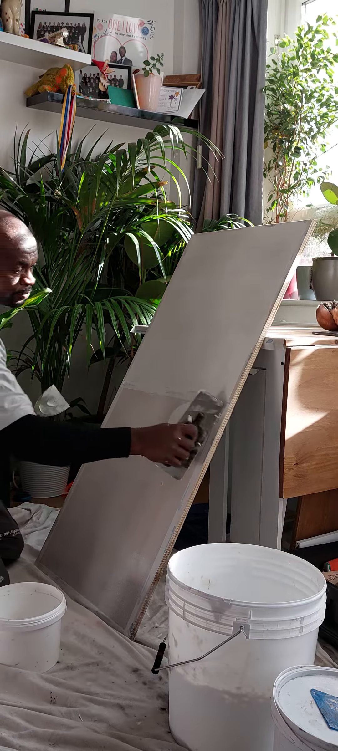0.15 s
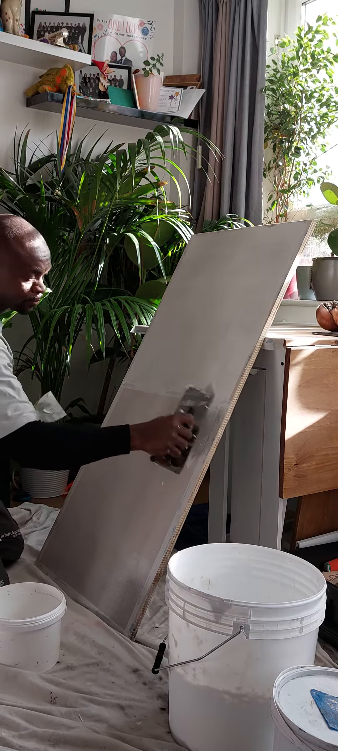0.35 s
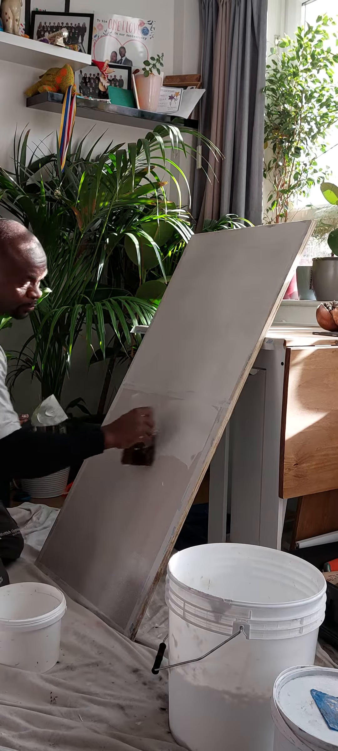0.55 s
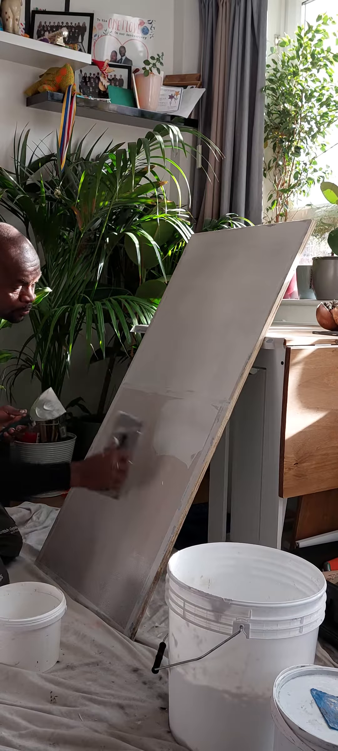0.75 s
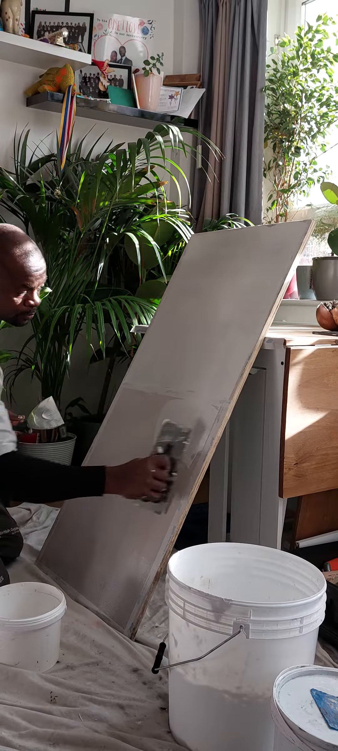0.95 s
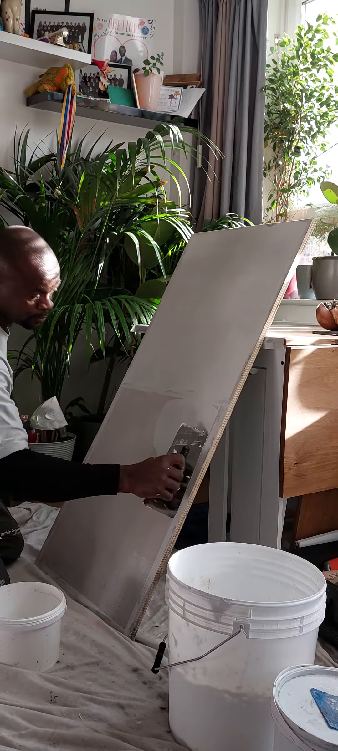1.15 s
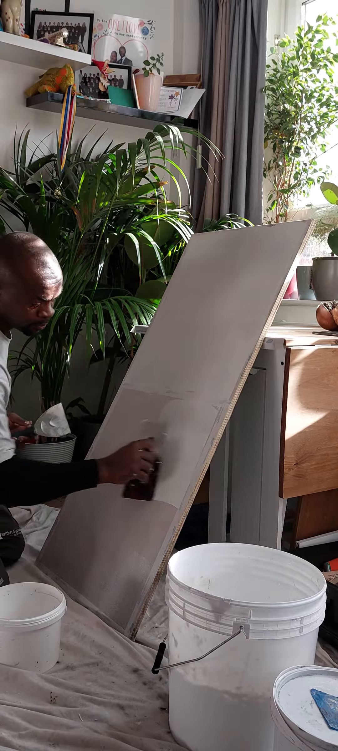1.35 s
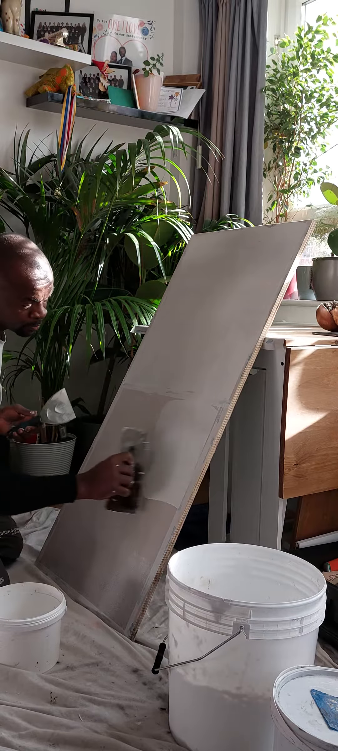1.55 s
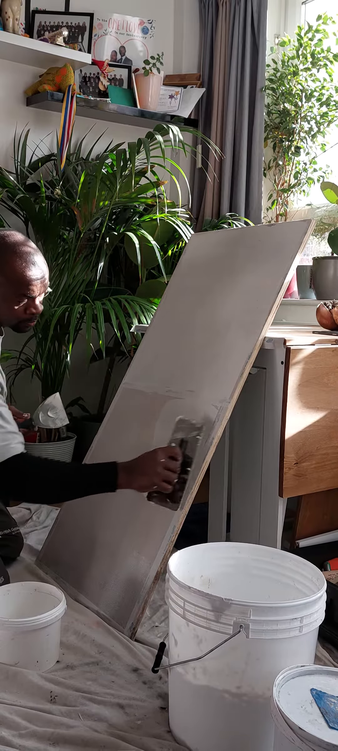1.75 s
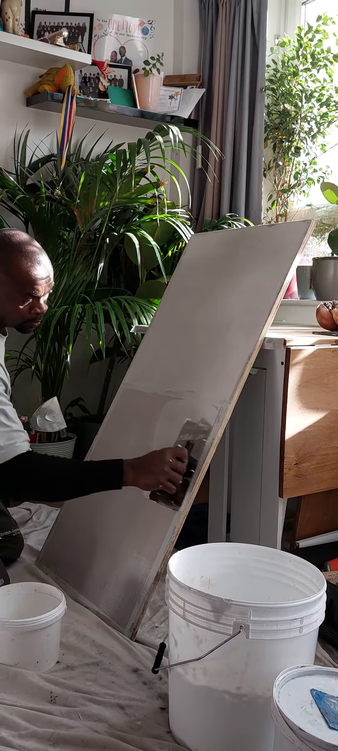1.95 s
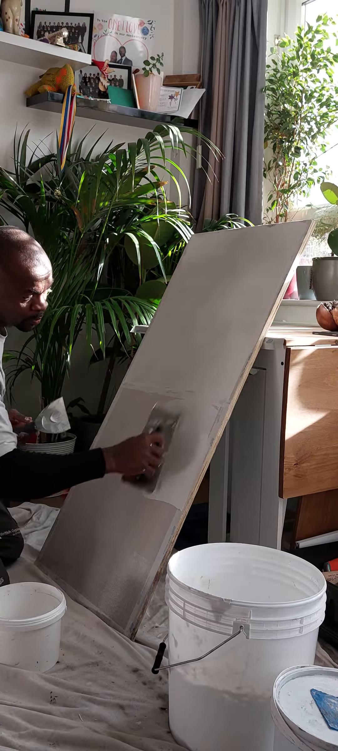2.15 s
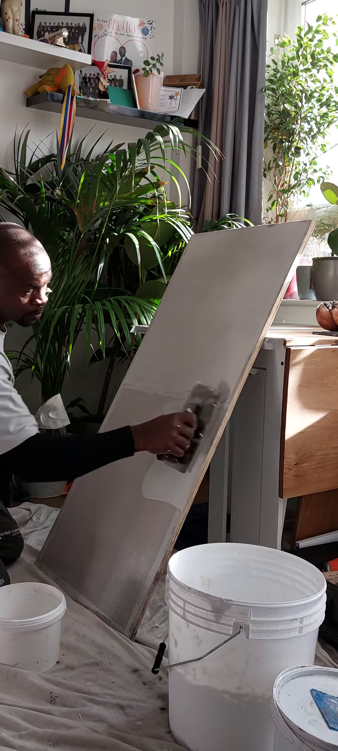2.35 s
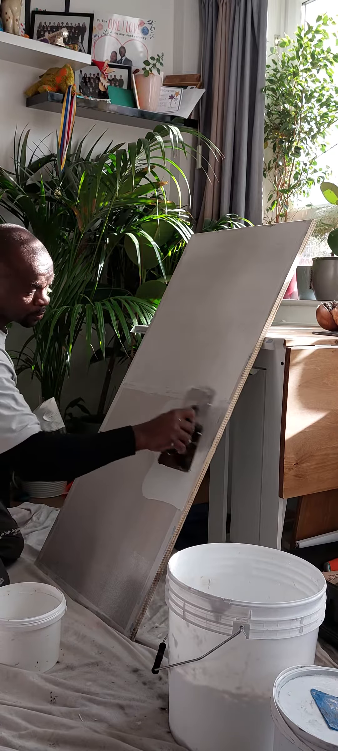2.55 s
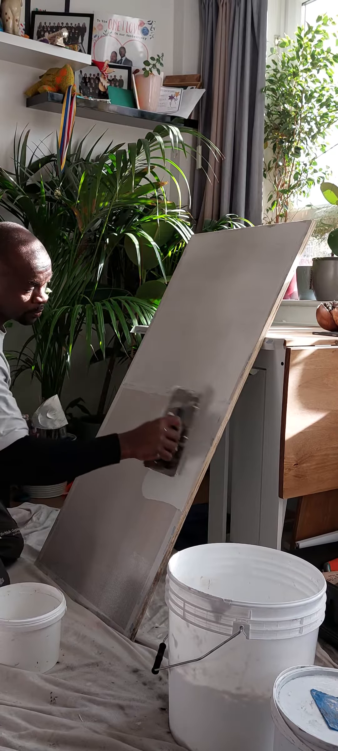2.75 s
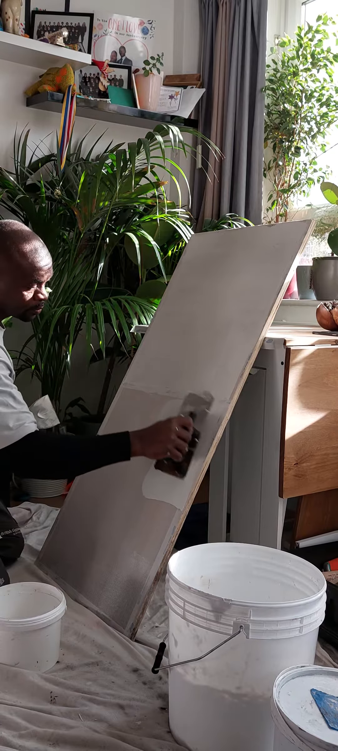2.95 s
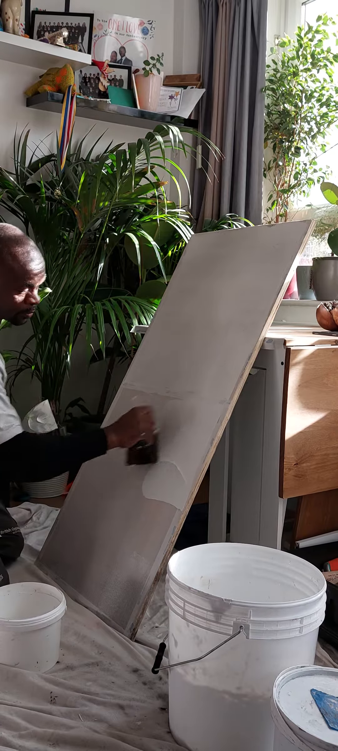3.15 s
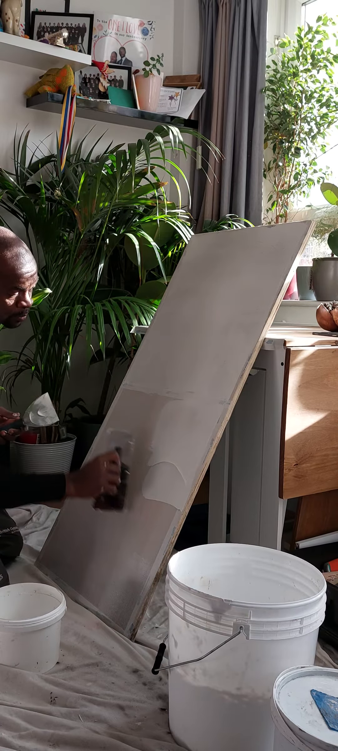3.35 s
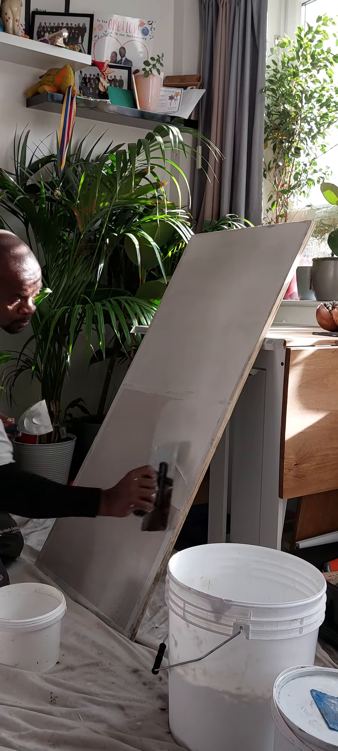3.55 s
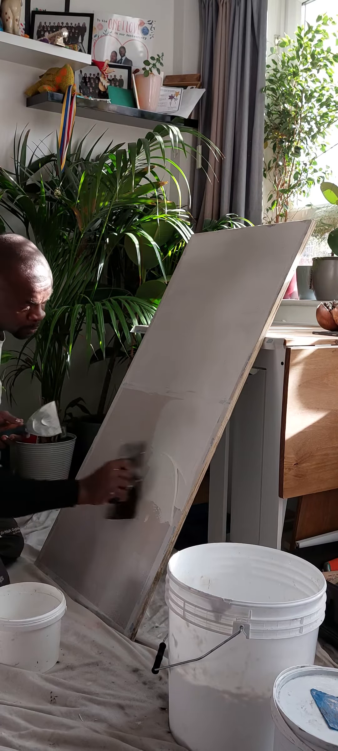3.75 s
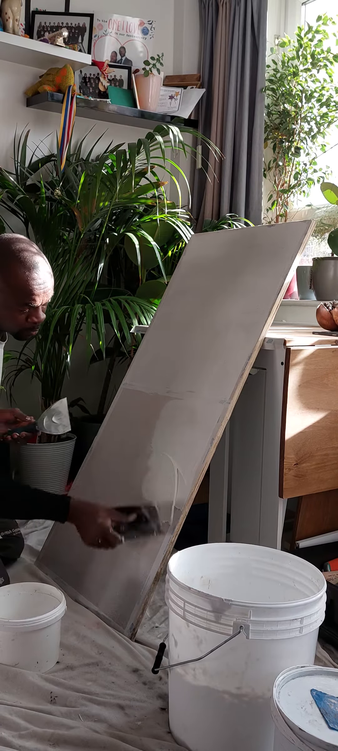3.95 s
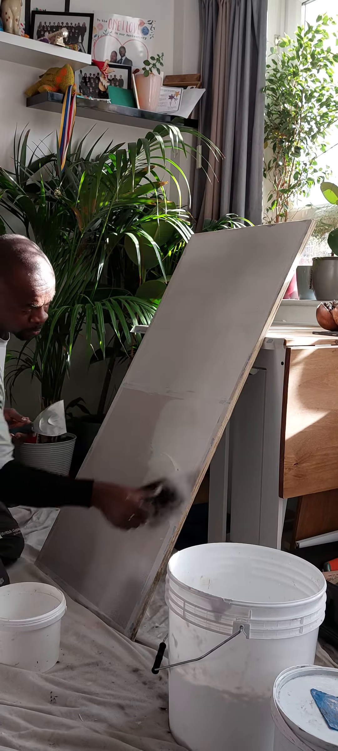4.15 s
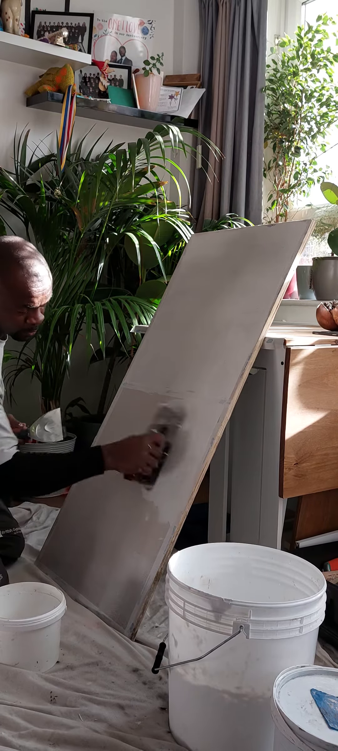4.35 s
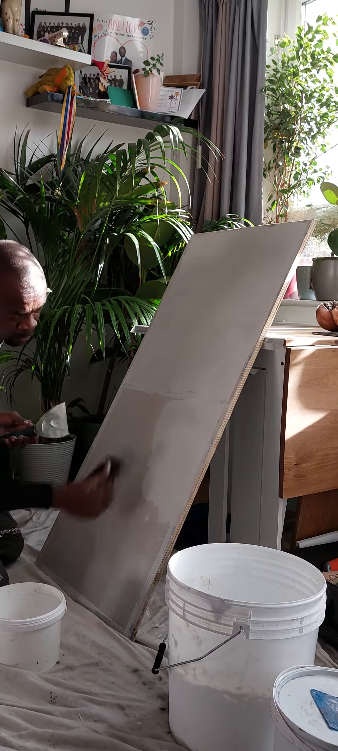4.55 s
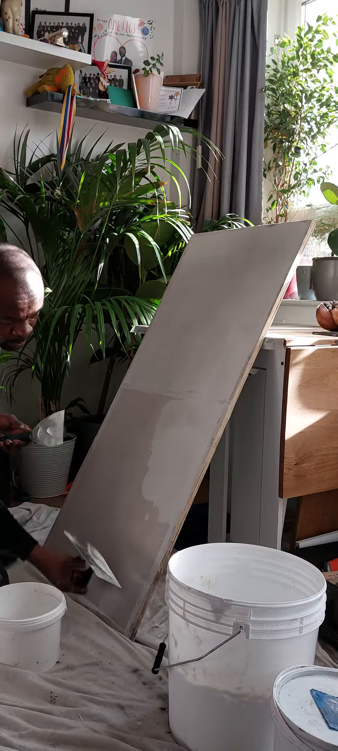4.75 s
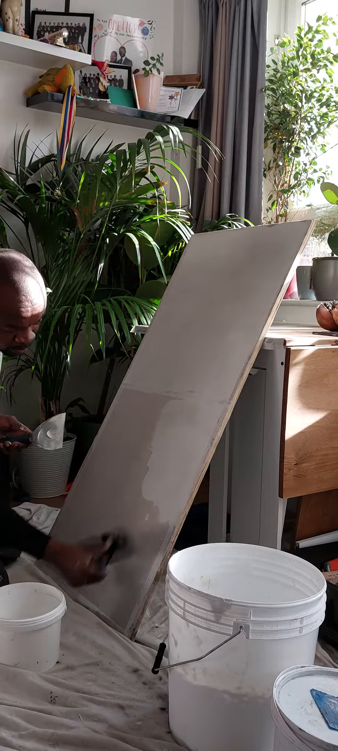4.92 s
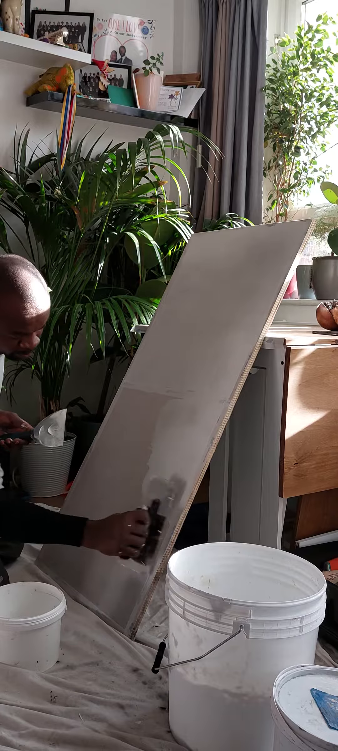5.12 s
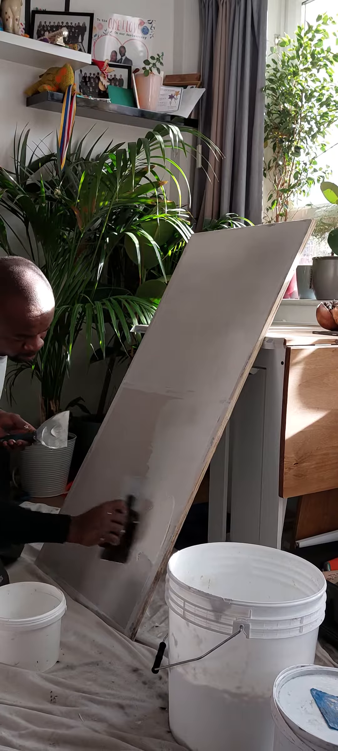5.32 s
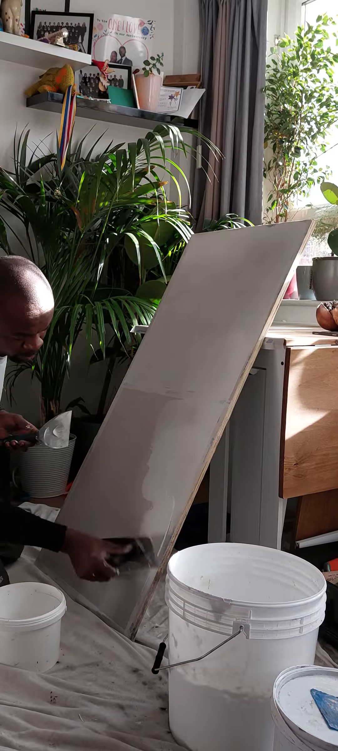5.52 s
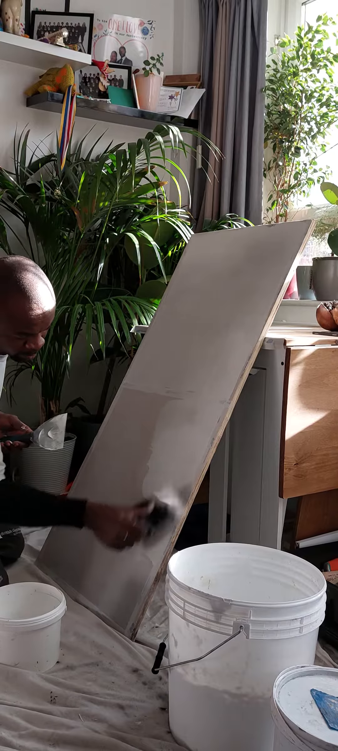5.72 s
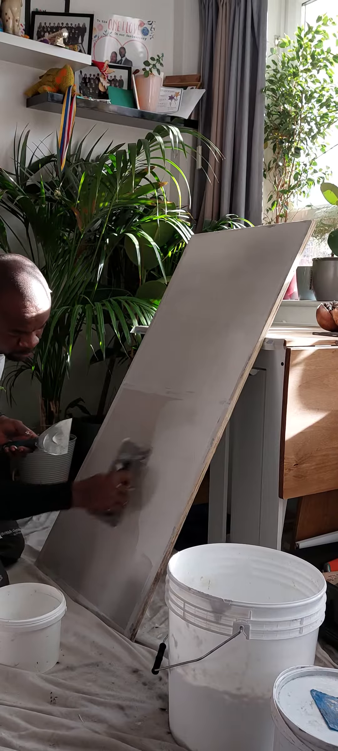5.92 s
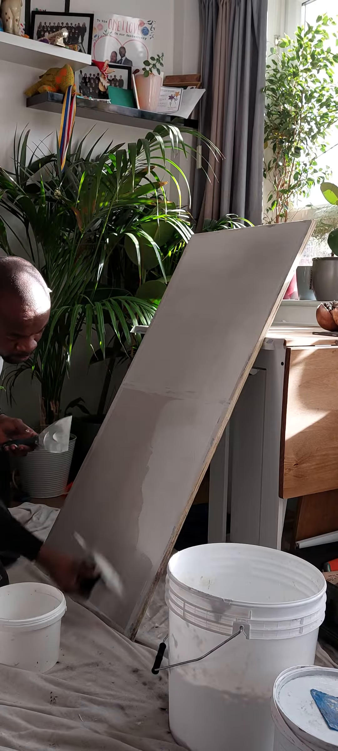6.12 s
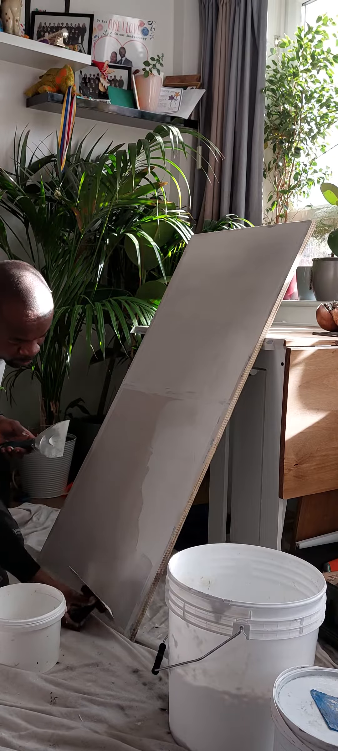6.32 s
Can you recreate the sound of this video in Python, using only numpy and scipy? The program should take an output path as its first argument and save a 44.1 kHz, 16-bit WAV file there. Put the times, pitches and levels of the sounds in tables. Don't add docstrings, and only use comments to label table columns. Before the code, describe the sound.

A plasterer's steel blade rasps over a board, long and short strokes alternating irregularly. Dense sandy hiss mixes with a midrange metallic ring and a low panel boom. Light edge taps and dull hand bumps come between strokes. The scraping stops after four and a half seconds, then a tiny soft scrape and one last fuller sweep follow. Short room tails, faint hum and still air, heard closely in stereo.

```python
import sys
import numpy as np
from scipy import signal
from scipy.fft import rfft, irfft, next_fast_len
from scipy.io import wavfile
from scipy.ndimage import uniform_filter1d

SR = 44100
rng = np.random.default_rng(int(sys.argv[2]) if len(sys.argv) > 2 else 0)


def magnitude_from_level(level_db):
    exponent = np.asarray(level_db, float) / 20
    return 10 ** exponent


def inscribe(sig):
    pcm = np.round(np.clip(np.atleast_2d(sig).T, -1, 1) * 32767)
    wavfile.write(sys.argv[1], SR, pcm.astype(np.int16))


N = 281358


def evened(x):
    return x / np.sqrt(np.mean(x ** 2) + 1e-20)


def read(points, hz):
    f, value = np.transpose(points)
    return np.interp(np.log(hz + 1), np.log(f + 1), value)


def colour(x, gain):
    size = next_fast_len(x.shape[-1])
    spectrum = rfft(x, size) * gain(np.fft.rfftfreq(size, 1 / SR))
    return irfft(spectrum, size)[..., :x.shape[-1]]


def above(x, hz, order=4):
    return signal.sosfilt(signal.butter(order, hz, "high", fs=SR, output="sos"), x)


def drift(per_s):
    rate = 40
    steps = rng.standard_normal(int(N / SR * rate) + 2)
    for _ in range(2):
        steps = uniform_filter1d(steps, int(rate / per_s))
    return np.interp(np.arange(N) / SR * rate, np.arange(len(steps)), evened(steps))


def ring(force, modes, wander_db=0):
    out = np.zeros(N)
    power = 0
    for k, (hz, width, db) in enumerate(modes):
        r = np.exp(-np.pi * width / SR)
        turn = np.exp(2j * np.pi * np.cumsum(hz * np.ones(N)) / SR)
        drive = force * magnitude_from_level(db + wander_db * drift(6))
        swing = turn * signal.lfilter([1 - r], [1, -r], drive / turn)
        out += (-1) ** k * 2 * swing.imag
        power += np.pi * width / SR * magnitude_from_level(2 * db)
    return out / np.sqrt(power)


def pair(a, b, same, hz):
    c = np.clip(read(same, hz), -1, 1)
    return np.array([a, c * a + np.sqrt(1 - c ** 2) * b])


# frequency in Hz, level in dB per Hz.
AIR_COLOUR = [(90, -40), (150, -2), (220, 0), (430, -6), (850, -10.5), (1550, -13), (2700, -19),
              (4600, -19), (7200, -19), (9200, -21.5), (11700, -20.5), (15700, -21.5)]
# frequency in Hz, left-right likeness from -1 to 1.
AIR_LIKENESS = [(60, -0.075), (380, 0.73), (2380, -0.04), (15000, 0.5)]
# time in seconds, lift in dB.
AIR_SWELLS = [(0, 14.5), (.15, 3.5), (1.001, 0.5), (1.801, -5), (2.4, -2), (3.6, -1.5), (4.78, 1),
              (4.92, -2), (5.171, -4), (5.211, 1.5), (6.2, -3), (6.38, -3.5)]


def air():
    hz = np.fft.rfftfreq(2048, 1 / SR)[:, None]
    a, b, c, d = rng.standard_normal((N // 512 + 5, 1025, 4)).T
    z = pair(a + 1j * b, c + 1j * d, AIR_LIKENESS, hz) * magnitude_from_level(read(AIR_COLOUR, hz))
    noise = signal.istft(z, nperseg=2048, noverlap=1536)[1][:, :N]
    swell_db = np.interp(np.arange(N) / SR, *np.transpose(AIR_SWELLS)) + drift(4.1)
    return magnitude_from_level(-71.5 + swell_db) * evened(noise)


# frequency in Hz, width in Hz, level in dB.
ROCKING_MODES = [(69, 27, 2), (119, 28, 2), (50.4, 20, -14.5), (86.5, 25, -6.5)]
# time in seconds, level in dB.
HAND_JOLTS = [
    (.22, -43.5),
    (1.13, -55),
    (1.9, -55),
    (2.23, -51.5),
    (2.93, -48.5),
    (3.35, -44.5),
    (3.5, -60),
    (4.1, -49.5),
    (5.38, -56),
    (5.86, -45.5),
]


def rocking(leaning):
    settle_s, hum_db = .05, -71.5
    keep = np.exp(-1 / (settle_s * SR))
    jolts = np.zeros(N)
    for s, db in HAND_JOLTS:
        jolts[round(s * SR)] = magnitude_from_level(db) / (1 - keep)
    hand = signal.lfilter([1 - keep], [1, -keep], leaning + jolts)
    push = np.hypot(hand, magnitude_from_level(hum_db))
    return ring(rng.standard_normal(N) * push, ROCKING_MODES, wander_db=4.5)


def grit(per_s, spread_db, judder_db):
    size = magnitude_from_level(spread_db * np.minimum(rng.exponential(1, N), 4)) * rng.choice([-1., 1.], N)
    clicks = size * (rng.random(N) < per_s / SR)
    rushes = evened(signal.lfilter([1], [1, -.997], rng.standard_normal(N)))
    return evened(clicks) * magnitude_from_level(judder_db * rushes)


def lay(contact, curves, start, end, *columns):
    inside = slice(round(start * SR), round(end * SR))
    t = np.arange(N)[inside] / SR
    louder = columns[0][inside] > curves[0, inside]
    for row, column in zip(curves, columns):
        row[inside] = np.where(louder, (column + np.zeros(N))[inside], row[inside])
    edges = np.clip(np.minimum((t - start) / 0.0058, (end - t) / 0.007), 0, 1)
    contact[inside] = np.maximum(contact[inside], edges)


# start in seconds, length in seconds,
# hiss in dB, board bending in dB re hiss, board boom in dB re hiss.
BLADE_CREEPS = [
    (0, 0.043, -63.5, -1.5, 13.5),
    (.191, 0.08, -52.5, 13, 16),
    (1.1, .135, -61.5, 0.5, 17.5),
    (1.875, .09, -50.5, 12, 16),
    (2.426, 0.14, -51.5, 2.5, 14),
    (5.197, 0.15, -80, 13.5, 20.5),
    (5.488, 0.23, -61.5, 13, 14),
    (6.33, 0.0861, -87, 15, 0.5),
]


def creep(contact, curves):
    t = np.arange(N) / SR
    for s, length, db, bending_db, boom_db in BLADE_CREEPS:
        hiss_db = db - 7.5 * (t - s) / length
        blade_db = 3.5 - 0.38 * (db + 56)
        chatter_hz, pan_db = 1150, 0
        lay(contact, curves, s, s + length, hiss_db, blade_db, bending_db, boom_db, chatter_hz, pan_db)


# bite in seconds, speeding up in seconds, lift in seconds,
# grit hiss at full speed in dB, last flick in dB.
BLADE_SWEEPS = [
    (.278, 0.2, 0.63, -28, 4),
    (1.223, 0.18, 1.47, -31, 2),
    (1.945, .12, 2.121, -28.5, -1),
    (2.52, 0.11, 2.648, -30, 3),
    (2.909, .14, 3.247, -29, 4),
    (3.713, .075, 3.801, -29, 2),
    (4.055, .15, 4.455, -30, -0.5),
    (5.311, 0.044, 5.368, -33, 3),
    (5.592, 0.17, 5.926, -28, -2.5),
]
# blade ring in dB re hiss, board bending in dB re hiss,
# board boom in dB re hiss, blade chatter in Hz, left-right balance in dB.
SWEEP_GRIPS = [(7.5, 0.5, -3, 1260, 0.5), (4.5, -1.5, -1, 1220, -0.5), (4.5, -2, -4, 1323, 0.5),
               (8, -1.5, -6, 1360, -0.5), (5, -1, -3.5, 1290, 0), (8, -4.5, -15, 1350, 1.5),
               (5.5, -3, -4, 1220, -1), (11, -3.5, -12.5, 1250, 0), (4.5, -0.5, -5.5, 1280, 0.5)]
# bite in dB re full speed, share of the slow start the board ignores
# (up to 1; below 0 the board loads late), heaviest lean in seconds.
SWEEP_LEANS = [(-16, .6, 0.87), (-13, 0.5, 1.28), (-17, 0.36, 2.025), (-13, 0.5, 2.63), (-14, 0.92, 3.15),
               (-35, -.2, 3.82), (-13.5, 0.8, 4.26), (-31.5, -.4, 5.42), (-20.5, 0.35, 5.8)]


def sweep(contact, curves):
    flick_s, lift_s, lean_s = 0.04, .1, 0.061
    t = np.arange(N) / SR
    for (s, rise, lift, db, flick_db), grip, (bite_db, lag, lean_at) in zip(BLADE_SWEEPS, SWEEP_GRIPS, SWEEP_LEANS):
        blade_db, bending_db, boom_db, hz, pan_db = grip
        bite = magnitude_from_level(bite_db)
        speed = bite + (1 - bite) * np.clip((t - s) / rise, 0, 1) ** 1.47
        slow_db = 20 * np.log10(speed)
        flick = np.exp(-np.maximum(lift - t, 0) / flick_s)
        after = np.maximum(t - lift, 0)
        lean = np.exp(-((t - lean_at) / lean_s) ** 2)
        hiss_db = db + slow_db + flick_db * flick - 240 * after * (1 + 4.2 * after)
        blade_db = blade_db - 79.5 * after
        bending_db = bending_db + 3.5 * flick ** 1.2 - (lag - .45) * slow_db
        boom_db = boom_db - lag * slow_db - flick_db * flick + 5 * lean + 60.5 * after
        chatter_hz = hz + 90 * (flick - .5)
        lay(contact, curves, s, lift + lift_s, hiss_db, blade_db, bending_db, boom_db, chatter_hz, pan_db)


def blade_motion():
    contact = np.zeros(N)
    curves = np.zeros((6, N)) + [[-120], [0], [0], [0], [1200], [0]]
    creep(contact, curves)
    sweep(contact, curves)
    curves[4] += 72.4 * drift(10)
    curves[5] += 1.5 * drift(11)
    return contact, curves


# frequency in Hz, level in dB per Hz.
GRIT_COLOUR = [(1000, -35.5), (1700, 2), (2050, -1.5), (2250, -6), (2710, -3), (2980, -9), (3970, -8.5),
               (5560, -13.5), (7700, -15.5), (9200, -23.5), (12100, -16), (15100, -18.5), (15800, -22.5)]


def grit_hiss(pressed, force):
    def gain(hz):
        return magnitude_from_level(read(GRIT_COLOUR, hz))
    return magnitude_from_level(0.36) * colour(pressed, gain) / np.std(colour(force, gain))


# frequency in Hz, width in Hz, level in dB.
SCRAPING_EDGE = [(2078, 130, -5.5), (2485, 20, -4.5), (2507, 29, -10.5), (3130, 37, -0.5)]


def edge_ring(pressed):
    return magnitude_from_level(-10) * above(ring(pressed, SCRAPING_EDGE, wander_db=1.5), 1700)


# frequency in Hz, width in Hz, level in dB.
BLADE_MODES = [(874, 77, -10), (887, 29, -8.5), (1048, 170, -13), (1194, 16, -11.5), (1365, 77, -6),
               (1552, 70, -4), (1660, 53, -15.5), (1250, 840, -13)]


def blade_ring(force, chatter_hz):
    blade = above(ring(force, [*BLADE_MODES, (chatter_hz, 260, -1.5)], wander_db=.8), 600)
    return signal.sosfilt(signal.butter(2, 1900, fs=SR, output="sos"), blade)


# frequency in Hz, width in Hz, level in dB.
BOARD_BENDING = [(427, 76, -6.5), (528.5, 11, -5), (564.3, 28, 6), (613, 39, -17), (649, 100, -9),
                 (656, 67, -4.5), (785, 9, -24.5), (542, 353, -3)]


def board_bending(force):
    return above(ring(force, BOARD_BENDING, wander_db=.8), 360)


# frequency in Hz, width in Hz, level in dB.
BOARD_BOOM = [(223, 9, 0), (291, 18, -12), (345, 30, -19), (176, 14, -20), (255, 40, -22)]


def board_boom(force):
    return above(ring(force, BOARD_BOOM, wander_db=0.8), 210)


# time in seconds, peak in dB, board share in dB.
EDGE_TOUCHES = [(0.196, -41, 8.5), (0.28, -36, -16), (1.108, -42, 9), (1.229, -46, 15.5),
                (1.877, -34.5, -3.5), (2.429, -36.5, -14), (2.525, -34, -33), (2.913, -24.5, -0.5),
                (4.058, -27, -2.5), (5.328, -32, -30), (5.596, -40, 1)]


def touches():
    blade_taps, board_taps = np.zeros((2, N))
    for s, db, board_db in EDGE_TOUCHES:
        blade_taps[round(s * SR)] = magnitude_from_level(db + 18.5)
        board_taps[round(s * SR)] = magnitude_from_level(db + board_db + 14.0)
    return blade_taps, board_taps


def trowel():
    contact, (hiss_db, blade_db, bending_db, boom_db, chatter_hz, pan_db) = blade_motion()
    force = grit(per_s=8300, spread_db=3.0, judder_db=.9)
    blade_taps, board_taps = touches()
    pressed = force * contact * magnitude_from_level(hiss_db)
    scrape = grit_hiss(pressed, force) + edge_ring(pressed)
    scrape += blade_ring(pressed * magnitude_from_level(blade_db) + blade_taps, chatter_hz)
    scrape += board_bending(pressed * magnitude_from_level(bending_db) + board_taps)
    boom = board_boom(pressed * magnitude_from_level(boom_db) + board_taps)
    leaning = contact * magnitude_from_level(-55.5 + .2 * (hiss_db + 32))
    return scrape, boom, uniform_filter1d(pan_db, 2000), leaning


# frequency in Hz, time to fall 60 dB in seconds.
ROOM_DECAY = [(150, .36), (400, .31), (1040, .31), (2760, .32), (7280, .3), (14000, .28)]
# frequency in Hz, left-right likeness from -1 to 1.
ROOM_LIKENESS = [(60, .4), (130, .6), (290, .9), (640, .66), (1410, .33), (3100, .13), (6820, 0),
                 (15000, -.03)]


def tail():
    length, scatter = SR // 2, 90
    taps = np.zeros((2, length))
    slots = np.arange(scatter, length - 12, 12)
    at = slots + rng.integers(0, 12, (2, (length - scatter - 1) // 12))
    np.put_along_axis(taps, at, rng.choice([-1., 1.], at.shape), 1)
    hz, lag, z = signal.stft(taps, SR, nperseg=256)
    fall_db = -60 * lag / read(ROOM_DECAY, hz)[:, None]
    z = pair(*z, ROOM_LIKENESS, hz[:, None]) * np.hypot(magnitude_from_level(fall_db), magnitude_from_level(-53 + .45 * fall_db))
    late = signal.istft(z, SR, nperseg=256)[1][:, :length]
    late *= np.cos(np.arange(length) * np.pi / SR) ** 0.12
    late[:, :scatter] = 0
    late /= np.linalg.norm(late[0])
    fade = np.exp(-np.arange(scatter) / 12)
    late[:, :scatter] = magnitude_from_level(-5.5) * rng.standard_normal((2, scatter)) * fade / 1.93
    return late


def room(scrape, low, pan_db, count=11):
    place = np.arange(N) / SR / .028
    echoes = np.zeros((2, N))
    for k in range(count):
        away = (place - k + count / 2) % count - count / 2
        turn = np.cos(np.pi / 2 * np.clip(away, -1, 1))
        sent = (scrape + 0.36 * low) * turn
        echoes += signal.fftconvolve(sent[None], tail(), axes=1)[:, :N]
    side = magnitude_from_level(np.outer([.5, -.5], pan_db))
    return side * (magnitude_from_level(-9.0) * scrape + magnitude_from_level(0.61) * echoes) + low


def scene():
    scrape, boom, pan_db, leaning = trowel()
    return room(scrape, boom + rocking(leaning), pan_db) + air()


def top_cut(x):
    return signal.sosfilt(signal.butter(12, 16790, fs=SR, output="sos"), x)


# frequency in Hz, left-right balance in dB.
MICROPHONE_BALANCE = [(40, 0), (130, -.5), (260, -1.2), (600, .4), (1300, 1), (2800, .1), (5500, .7),
                      (9000, -.6), (14000, -2.6)]


def record(dry):
    def microphone(x, half):
        return colour(x, lambda hz: magnitude_from_level(half * read(MICROPHONE_BALANCE, hz)) * (hz < 15850))
    left, right = above(dry, 36, order=2)
    mix = np.array([microphone(left, .5), microphone(right, -.5)])
    return top_cut(mix)


dry = scene()
out = record(dry)
inscribe(out)
```